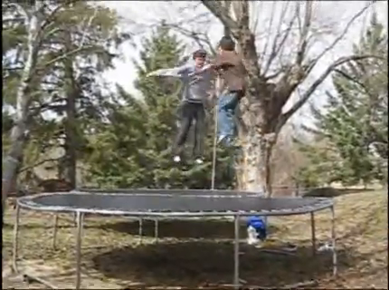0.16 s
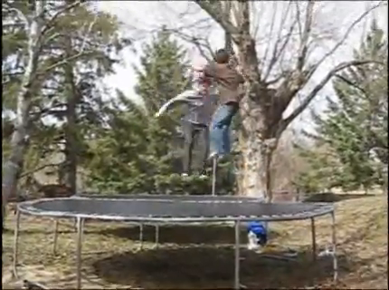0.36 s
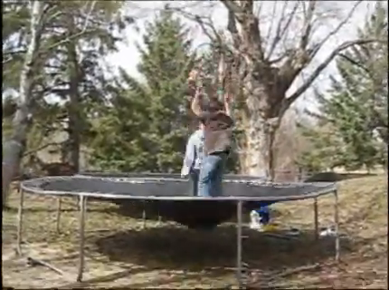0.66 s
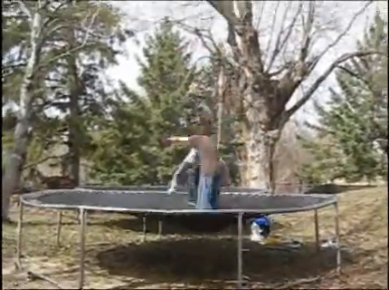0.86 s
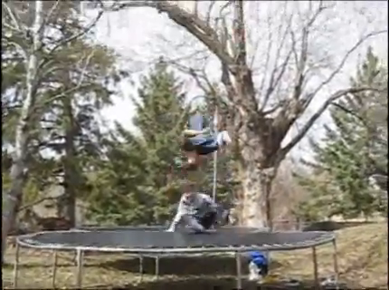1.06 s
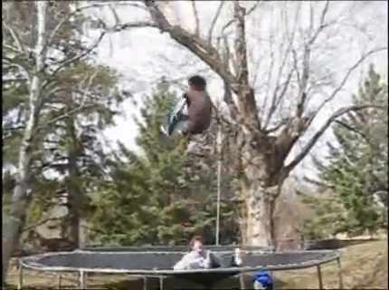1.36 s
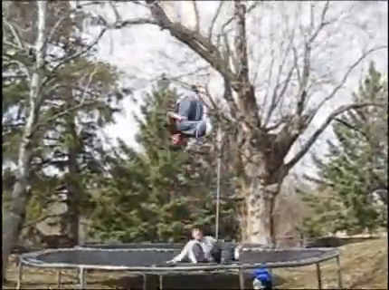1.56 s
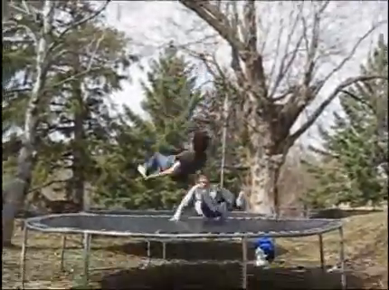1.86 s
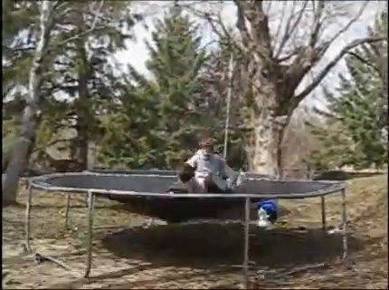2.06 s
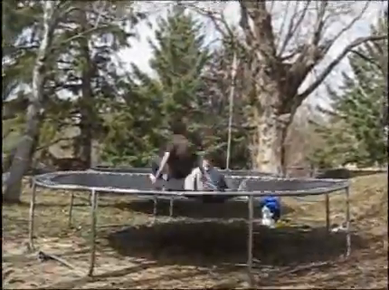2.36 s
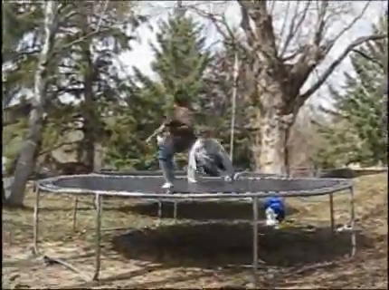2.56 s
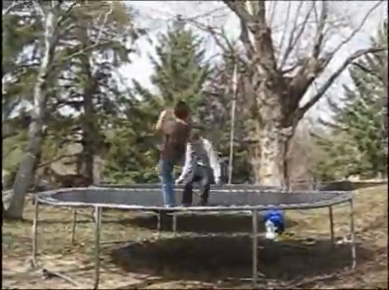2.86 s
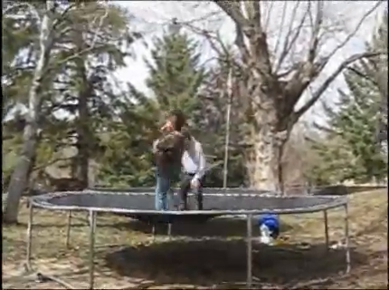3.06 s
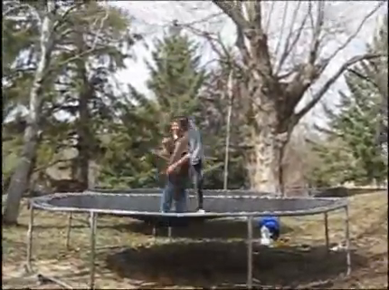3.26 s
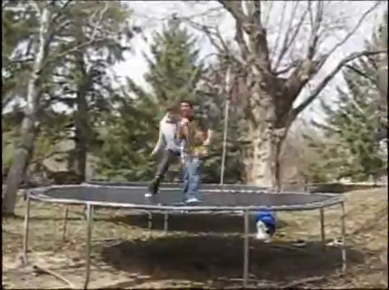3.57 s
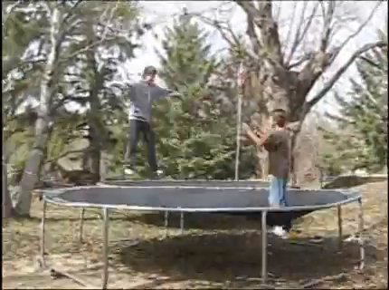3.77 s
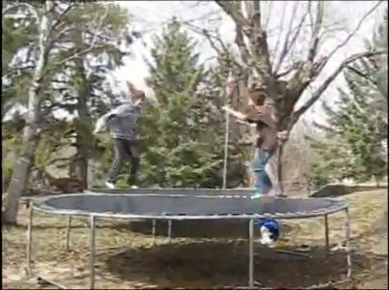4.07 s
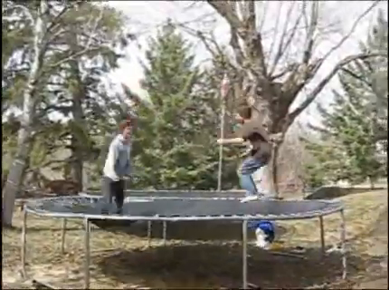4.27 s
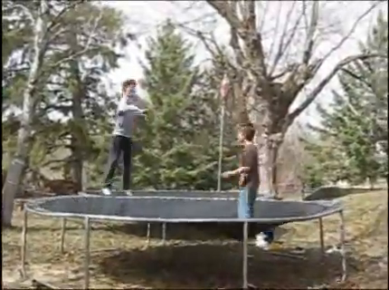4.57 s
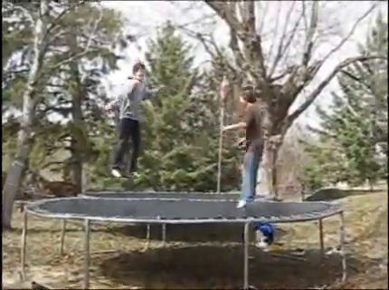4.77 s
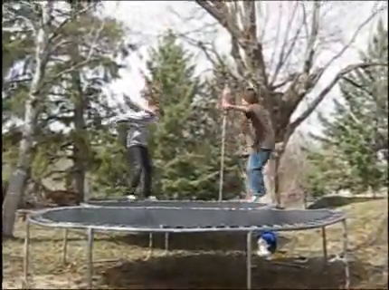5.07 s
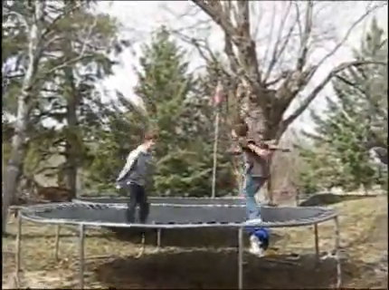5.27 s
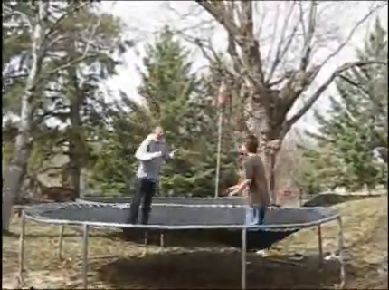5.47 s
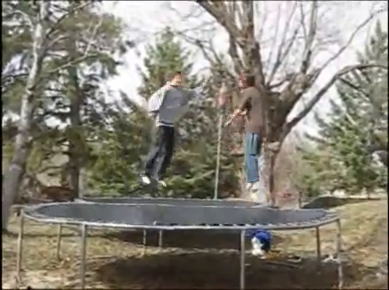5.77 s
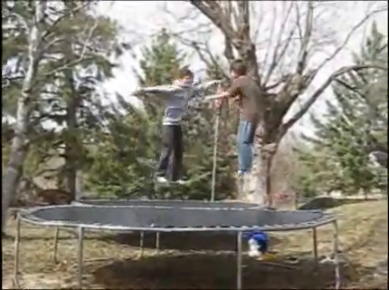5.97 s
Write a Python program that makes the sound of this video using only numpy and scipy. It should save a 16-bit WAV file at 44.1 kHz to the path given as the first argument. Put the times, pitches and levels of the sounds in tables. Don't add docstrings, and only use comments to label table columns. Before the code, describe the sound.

Bright metallic spring rattle and mat rasp surge and fade with trampoline landings outdoors, over soft wind, with one abrupt silent gap.

```python
import sys
import numpy as np
from scipy import signal
from scipy.fft import rfft, irfft, next_fast_len
from scipy.io import wavfile
from scipy.ndimage import uniform_filter1d

SR = 44100
rng = np.random.default_rng(int(sys.argv[2]) if len(sys.argv) > 2 else 0)


def ratio(d):
    e = np.asarray(d, float) / 20
    return 10 ** e


def master_out(mix):
    frames = np.transpose(np.atleast_2d(mix))
    ceiling = np.clip(frames, -1, 1)
    pcm = np.round(ceiling * 32767).astype(np.int16)
    wavfile.write(sys.argv[1], SR, pcm)


N = 270333


def in_time(rows):
    s, *columns = np.transpose(rows)
    return [np.interp(np.arange(N) / SR, s, c) for c in columns]


def rms_one(x):
    return x / np.sqrt(np.mean(x ** 2) + 1e-20)


def at_hz(points, hz):
    f, db = np.array(points).T
    return np.interp(np.log(np.maximum(hz, 1)), np.log(f), db)


def colour(x, points):
    size = next_fast_len(N + 8192)
    bins_hz = np.arange(size // 2 + 1) * SR / size
    cepstrum = irfft(np.log(ratio(at_hz(points, bins_hz))), size)
    cepstrum[1:size // 2] *= 2
    cepstrum[size // 2 + 1:] = 0
    return rms_one(irfft(rfft(x, size) * np.exp(rfft(cepstrum)), size)[:N])


def drift(rate_hz):
    r = np.exp(-2 * np.pi * rate_hz / SR)
    wander = signal.lfilter([1], [1, -2 * r, r * r], rng.standard_normal(N + SR))
    return rms_one(wander[SR:])


def ring(clicks, hz, t60):
    r, w = ratio(-60 / (t60 * SR)), 2 * np.pi * hz / SR
    return signal.lfilter([0, np.sin(w)], [1, -2 * r * np.cos(w), r * r], clicks + 1e-18)


def slips(per_s, spread_db):
    sizes = ratio(spread_db * np.minimum(rng.exponential(1, N), 5)) * rng.choice([-1, 1], N)
    return rms_one(sizes * (rng.random(N) < per_s / SR))


def steps(rows):
    out = np.zeros(N + SR)
    since = np.arange(SR // 2) / SR
    for s, peak_db, t60 in rows:
        out[round(s * SR):][:SR // 2] += ratio(peak_db - 60 * since / max(t60, .005))
    return out[:N]


def blows(rows):
    out = np.zeros(N + SR)
    for s, peak_db, hz, t60 in rows:
        push = np.zeros(round(min(1.5 * t60 + .01, 1) * SR))
        soft = np.hanning(round(SR / hz / 2) + 2)
        push[:len(soft)] = soft / soft.sum()
        out[round(s * SR):][:len(push)] += ratio(peak_db) * ring(push, hz, max(t60, .001))
    return out[:N]


def tone(rows, width_hz, depth):
    first, last = rows[0], rows[-1]
    fade_in, fade_out = (first[0] - .02, first[1], -140), (last[0] + .02, last[1], -140)
    hz, db = in_time([fade_in, *rows, fade_out])
    turn = 2 * np.pi * np.cumsum(hz) / SR
    along = (1 + depth * drift(width_hz)) * np.cos(turn)
    across = depth * drift(width_hz) * np.sin(turn)
    return ratio(db) * rms_one(along + across)


def tree_wind(level):
    # [t/s, level/dB]
    gusts = [
        (0, -50.5),
        (1.0, -51),
        (2.0, -49),
        (3.2, -50.5),
        (3.8, -47.5),
        (5.0, -47.5),
        (5.6, -47.5),
        (6.13, -49.5),
    ]
    # [f/Hz, level/dB]
    air = [(20, -15.5), (60, -1), (150, -0.5), (400, 1.5), (750, 3), (1300, 2), (2000, -3), (3000, -7.5),
           (5000, -20.5), (7000, -22), (9000, -20), (11000, -15.5), (15500, -28), (17000, -37.5)]
    duck_db, knee_db = -2.5, -33.5
    loudness = level ** 2 / (level ** 2 + ratio(knee_db) ** 2)
    pull_db = duck_db * uniform_filter1d(loudness, SR // 10)
    gain = ratio(in_time(gusts)[0] + pull_db + 1.0 * drift(6.1))
    return gain * colour(rng.standard_normal(N), air)


def port_rumble():
    # [t/s, level/dB, t60/s]
    bump_hits = [
        (.76, -63.5, .8),
        (2.062, -48, 1.0),
        (2.16, -57, 0.55),
        (2.595, -54, .4),
    ]
    rumble_db, top_hz = -71.5, 280
    lumps = signal.sosfilt(signal.butter(2, top_hz, fs=SR, output="sos"), rng.standard_normal(N))
    return np.hypot(ratio(rumble_db), steps(bump_hits)) * ratio(4.6 * drift(18)) * rms_one(lumps)


def far_drone():
    # [t/s, f/Hz, level/dB]
    drone_tones = [
        [(0.73, 229.2, -63), (1.2, 232.2, -62.5), (1.9, 229.2, -64), (2.7, 235, -56.5), (3.2, 232.7, -58)],
        [(3.8, 85.46, -64), (4.25, 85.6, -61), (4.55, 88.7, -66), (4.85, 91.5, -55.5), (5.4, 89.6, -57.5),
         (5.7, 90, -72)],
        [(3.8, 130.4, -61), (4.5, 138.9, -61.5), (5.5, 147.6, -65)],
        [(5.65, 125.6, -62), (5.9, 121.6, -56), (6.13, 121.8, -52)],
    ]
    # [t/s, f/Hz, level/dB]
    hum_tone = [
        (3.8, 333.2, -51),
        (4.5, 332.8, -55),
        (6.13, 328.5, -52.5),
    ]
    drone = sum(tone(rows, width_hz=6, depth=.3) for rows in drone_tones)
    return drone + tone(hum_tone, width_hz=56, depth=1.1)


def faint_bird():
    # [t/s, f/Hz, level/dB]
    call = [
        (.43, 3800, -84),
        (.46, 3620, -64),
        (.53, 3550, -68),
        (.56, 3630, -70),
        (.585, 3570, -59),
        (.62, 3500, -73),
        (.64, 3490, -85),
    ]
    return tone(call, width_hz=25.0, depth=0.5)


def thuds():
    # [t/s, level/dB, f/Hz, t60/s]
    thud_hits = [(.06, -41.5, 482, 0.17), (2.063, -42, 328, .02), (.78, -45.5, 79.4, 0.2),
                 (1.132, -29.5, 628, 0.076), (1.2, -44, 223, 0.3), (2.062, -23, 140, 0.026),
                 (2.064, -25, 825, .015), (2.09, -27, 730, 0.084), (2.115, -36.5, 152, .14),
                 (2.145, -38, 236, .1), (2.1, -47, 90, 0.18), (2.25, -45, 60, 0.12), (2.6, -38, 208, 0.057),
                 (2.715, -32, 1450, .06), (2.772, -33, 1350, 0.044), (2.795, -37, 1290, .04),
                 (4.6, -34, 1410, .1), (5.45, -34, 1394, .1), (3.135, -33.5, 583, 0.11),
                 (3.137, -36.5, 738, 0.13), (3.141, -30, 1407, 0.09), (3.895, -23.5, 1078, 0.017),
                 (4.35, -35.5, 798, 0.16), (5.38, -36.5, 758, 0.12), (5.55, -41, 694, 0.14)]
    return blows(thud_hits)


def mat(clicks, rasp, hiss):
    # [f/Hz, level/dB]
    rasp_colour = [(300, -36.5), (500, -16.5), (700, -1.5), (1000, -4), (1350, 5), (1700, 4), (2200, -31.5)]
    hiss_colour = [(7000, -38), (8200, -2.5), (9300, 3.5), (10500, -1.5), (13000, -4), (15500, -6.5),
                   (17000, -19)]
    low = colour(0.55 * clicks + rng.standard_normal(N), rasp_colour) * ratio(1.4 * drift(7.1))
    pitches = np.geomspace(8400, 15200, 24) * ratio(0.092 * rng.standard_normal(24))
    dealt = rng.integers(0, 96, N)
    tinkle = sum(ring(clicks * (dealt == k), hz, 350.0 / hz) for k, hz in enumerate(pitches))
    friction = 0.31 * clicks + rng.standard_normal(N) + ratio(-8.5) * rms_one(tinkle)
    high = colour(friction, hiss_colour) * ratio(1.2 * drift(25))
    return rasp * low + hiss * high


def ringing_on():
    # [t/s, level/dB, f/Hz, t60/s]
    ping_hits = [(.01, -27.5, 3600, 0.71), (.21, -51.5, 4600, .7), (.05, -36, 2320, .3),
                 (0.72, -53, 3140, .12), (0.66, -55, 2600, .1), (1.3, -36, 4600, 0.096),
                 (0.86, -37, 4500, .15), (2.6, -45.5, 4900, .5), (.7, -31, 2150, 0.13),
                 (3.2, -17, 3700, 0.14), (5.7, -32, 3720, .3), (5.66, -34, 2900, 0.19),
                 (3.9, -25, 5830, 0.28), (4.725, -20, 2570, 0.15), (4.95, -42, 3400, 0.75),
                 (4.1, -37, 3900, 0.55), (4.95, -44, 3300, 0.5), (5.82, -37.5, 3200, 0.97),
                 (.05, -34, 3124, 1.1), (.05, -36, 3058, .9), (.03, -32, 3290, .45), (.08, -39, 3200, .7),
                 (4.85, -40, 3247, .8), (4.9, -41, 3130, .7), (5.08, -49, 3450, .4), (5.8, -40, 3250, 1.0),
                 (5.87, -39, 3730, .7), (5.95, -43, 4850, .6), (5.9, -48, 4130, .4)]
    rows = ping_hits
    waver_depth, waver_hz = .8, 40
    return sum(blows(rows[k::3]) * 0.69 * (1 + waver_depth * drift(waver_hz)) for k in range(3))


def rough_tones():
    # [t/s at the top, f/Hz, level/dB]
    tone_swells = [(0.044, 4530, -36), (0.046, 2220, -34.5), (0.087, 3100, -38), (0.713, 2166, -42),
                   (0.72, 4570, -42), (0.736, 3270, -41), (0.755, 5430, -37), (0.877, 3740, -41),
                   (0.988, 3285, -42), (1.138, 4030, -37), (1.139, 2950, -37), (1.142, 4570, -35),
                   (1.428, 4570, -35), (1.624, 3090, -38.5), (2.106, 4470, -35.5), (2.145, 3100, -40),
                   (2.151, 5980, -46), (2.155, 3790, -40), (2.239, 3150, -38), (2.318, 4500, -41),
                   (2.339, 3100, -35.5), (2.347, 4610, -37), (2.352, 5600, -35), (2.474, 3200, -36.5),
                   (3.064, 5180, -39), (3.146, 3100, -42.5), (3.86, 4195, -38), (3.862, 5240, -39),
                   (3.865, 3460, -31), (3.87, 5580, -39), (3.966, 3530, -37), (3.974, 4840, -40),
                   (4.016, 3100, -40), (4.355, 2240, -38), (4.36, 5080, -38), (4.373, 3210, -36),
                   (4.386, 5610, -35), (4.574, 3650, -32), (4.58, 5400, -33.5), (4.734, 3680, -32),
                   (4.843, 3110, -35), (4.852, 5450, -36), (4.897, 3060, -40.5), (5.368, 5150, -32.5),
                   (5.407, 3090, -33.5), (5.581, 3110, -40), (5.608, 4150, -39), (5.632, 3204, -33)]
    length_s, gain_db, width_hz, roughness = 0.05, 3, 90, .9
    out = np.zeros(N + SR)
    rough = roughness * np.array([drift(width_hz), drift(width_hz)])
    swell = np.hanning(round(length_s * SR))
    for s, hz, db in tone_swells:
        at = round(s * SR) - len(swell) // 2 + np.arange(len(swell))
        turn = 2 * np.pi * hz * at / SR
        along, across = rough[:, (at + 7 * round(hz)) % N]
        out[at] += ratio(db + gain_db) * swell * ((1 + along) * np.cos(turn) + across * np.sin(turn))
    return out[:N]


def snaps():
    # [t/s, level/dB]
    hook_snaps = [(0.0532, -18), (0.2106, -26), (0.707, -20), (0.7885, -26), (0.9161, -28), (1.0805, -24),
                  (1.1072, -19), (1.1362, -19), (1.1755, -13.5), (1.2909, -23), (1.517, -24), (1.5596, -31),
                  (1.6263, -24), (1.6524, -24), (1.699, -25), (1.865, -24), (1.9308, -22), (1.9581, -28),
                  (2.2894, -19), (2.3802, -26), (2.3987, -29), (2.4887, -15), (2.5104, -17), (2.5751, -23),
                  (2.5994, -23), (2.6934, -23), (2.7427, -25), (2.786, -27), (2.9059, -31), (2.937, -31),
                  (3.0964, -20), (3.1459, -18.5), (3.8551, -19), (3.8699, -15.5), (3.938, -20),
                  (3.9611, -19), (4.1653, -26), (4.23, -30), (4.3577, -17), (4.4144, -27), (4.5078, -18),
                  (4.5692, -17), (4.636, -17), (4.7281, -14.5), (4.8476, -12.5), (4.8924, -22),
                  (5.3652, -14.5), (5.3744, -19), (5.5819, -19), (5.8704, -23)]
    modes = (3300, -3), (4900, -3), (9500, -7)      # (f/Hz, level/dB)
    t60 = .0035
    spread = ratio(1.0 * rng.standard_normal((len(hook_snaps), 3)))
    rows = []
    for (s, db), detune in zip(hook_snaps, spread):
        for (hz, mode_db), k in zip(modes, detune):
            rows.append((s, db + mode_db, hz * k, t60))
    return blows(rows)


def jolts():
    # [t/s, level/dB]
    jolt_hits = [(.0494, -19), (.2089, -19.5), (.7594, -13), (.9805, -12), (1.0794, -11), (1.1344, -8),
                 (1.5792, -10), (.9, -17), (1.44, -10), (2.1044, -14), (2.1534, -6.5), (2.3511, -7.5),
                 (2.5194, -24), (2.5995, -10), (2.24, -12), (2.405, -13), (2.4703, -14), (2.215, -15),
                 (1.065, -16), (4.37, -16), (4.415, -20), (5.58, -16), (5.73, -9), (3.1446, -19),
                 (3.8535, -9.5), (3.868, -10), (3.096, -16), (3.938, -9), (3.961, -9.5), (3.994, -11),
                 (4.347, -15), (4.501, -25), (4.5694, -11), (4.555, -11), (4.58, -13), (4.6344, -11),
                 (4.7254, -5), (4.8493, -10), (5.3642, -18), (5.4044, -12), (5.6194, -9), (5.8044, -25)]
    rise_s, t60 = 0.006, 0.054
    sudden = steps([(s, db - 16.0, t60) for s, db in jolt_hits])
    return uniform_filter1d(sudden, round(rise_s * SR) + 1)


def load():
    # [t/s at full load, rise/s, hold/s, level/dB, brightness/dB]
    foot_strokes = [(0.0, .02, 0.051, -27, -1.5), (0.706, 0.027, 0.21, -28, 2.5),
                    (0.955, 0.082, 0.08, -27.5, 2.5), (1.065, 0.03, 0.12, -27.5, -2),
                    (1.243, 0.067, 0.15, -39, -1.5), (1.405, 0.14, .18, -27.5, 1),
                    (1.607, .05, 0.087, -31.5, 3), (1.713, .06, 0.16, -38, -1.5),
                    (2.09, 0.033, 0.46, -28, 1.5), (2.605, 0.013, 0.031, -32, 2),
                    (2.726, 0.081, 0.014, -30.5, 2.5), (2.769, .03, 0.023, -36, -1),
                    (2.87, .03, .02, -50, 0), (2.897, 0.012, 0.014, -41, 2),
                    (3.034, 0.109, 0.056, -33.5, 2), (3.12, .03, .05, -35.5, 2),
                    (3.839, 0.0094, 0.024, -25.5, 3), (3.925, 0.032, 0.056, -32.5, 2.5),
                    (4.015, 0.058, 0.18, -33, -2.5), (4.351, 0.055, 0.08, -25.5, 0.5),
                    (4.511, 0.085, 0.088, -27, 1), (4.611, 0.037, 0.26, -28.5, -1),
                    (4.897, .04, 0.071, -36, -2.5), (5.358, 0.033, .34, -27.5, 1),
                    (5.716, 0.044, 0.093, -29, -1.5)]
    # [t/s, level/dB, brightness/dB]
    brief_swells = [(0.13, -34.5, 0.5), (0.15, -36, -2), (0.21, -37.5, 3), (.285, -50, 4),
                    (.643, -59.5, 2.5), (.76, -31.5, 6), (1.27, -39.5, 8.5), (1.864, -36.5, 0),
                    (1.8, -42.5, -0.5), (1.947, -36, 1), (1.955, -40.5, -1), (2.2, -31, 9),
                    (2.32, -34, 1.5), (2.005, -45.5, 1), (2.85, -49, -1), (2.937, -42, 1.5),
                    (3.146, -28, 1), (4.225, -40, 1), (4.26, -50, -8), (4.295, -51, -2), (4.165, -44, 11),
                    (2.045, -50, 2), (2.69, -40, -3.5), (2.977, -43, -1.5), (.088, -39, -3), (4.95, -51, 0),
                    (5.04, -59, -5), (5.09, -46, -5), (5.58, -31, -2), (5.75, -34.5, 13), (5.84, -37, -2),
                    (5.825, -35, -2), (4.47, -33, 0), (2.585, -37, 1), (1.915, -41, 0), (.2, -42, -2),
                    (5.878, -35.5, -3.5), (5.91, -39, -6), (5.954, -39.5, 2.5), (5.985, -64, 1),
                    (6.043, -52, 3)]
    brief_rise_s, brief_hold_s = 0.023, 0.0056
    rise_curve, sag_db_per_s, release_db_per_s = 2.12, 2, 300.5
    impact_db, impact_s = 2, 0.064
    t = np.arange(0, N, 16) / SR
    power, bright, impact = 1e-9, 0, 0
    brief_strokes = [(s, brief_rise_s, brief_hold_s, db, tilt) for s, db, tilt in brief_swells]
    for s, rise, hold, db, bright_db in foot_strokes + brief_strokes:
        since = np.maximum(t - s, 0)
        released = np.maximum(since - hold, 0)
        loss_db = np.minimum(sag_db_per_s * since + release_db_per_s * released, 150)
        swell = np.clip(1 + (t - s) / rise, 0, 1) ** rise_curve
        stroke = (ratio(db - loss_db) * swell) ** 2
        power = power + stroke
        bright = bright + bright_db * stroke
        impact = impact + impact_db * np.exp(-since / impact_s) * stroke
    return in_time(np.transpose([t, np.sqrt(power), bright / power, impact / power]))


def linger(level):
    after_db, t60, idle_db = -19, 0.75, -65.5
    r = ratio(-120 / (t60 * SR))
    after, _ = signal.lfilter([1 - r], [1, -r], level ** 2, zi=[level[0] ** 2])
    return np.sqrt(level ** 2 + ratio(after_db) ** 2 * after + ratio(idle_db) ** 2)


def frame_clatter(steel):
    # [f/Hz, level/dB]
    clatter_colour = [(1300, -30), (1750, -3.5), (2150, 2), (2550, 1), (3100, -26)]
    return colour(steel, clatter_colour)


def hook_rattle(steel):
    # [f/Hz, level/dB]
    rattle_colour = [(2300, -28.5), (2800, -1.5), (3100, 0.5), (3700, 1), (4500, 0.5), (5500, -1.5),
                     (6500, -6), (7500, -7.5), (8500, -19)]
    return colour(steel, rattle_colour)


def springs(level):
    # [f/Hz, level/dB, t60/s]
    coil_modes = [(1380, -16, .08), (1910, -15, .12), (2100, -19, .15), (2330, -13, .2), (2985, -10.5, 0.5),
                  (3060, -6.5, 0.76), (3095, -4, 0.58), (3115, -9.5, 0.5), (3130, -10.5, 0.6),
                  (3270, -6, 0.92), (3460, -4, 0.42), (3345, -7.5, 0.37), (3710, -5, 0.3), (4170, -5, 0.26),
                  (4550, -5.5, 0.17), (5020, -12, .2), (5530, -12, .15), (8780, -9.5, 0.2),
                  (9110, -10.5, .12)]
    clicks = slips(per_s=7000, spread_db=1.0)
    pitches = np.geomspace(1800, 7300, 60) * ratio(0.093 * rng.standard_normal(60))
    dealt = rng.integers(0, 60, N)
    busy = ratio(2.2 * np.array([drift(15) for side in range(5)]))
    busy /= np.sqrt(np.mean(busy ** 2, axis=0))
    short = 0
    for k, hz in enumerate(pitches):
        short = short + ring(clicks * (dealt == k) * busy[k % 5], hz, 150.0 / hz) * np.sqrt(hz)
    steel = clicks + ratio(-4.5) * rms_one(short)
    white, long = rng.standard_normal((3, N)), 0
    for k, (hz, db, t60) in enumerate(coil_modes):
        for twin in (0, 1):
            drive = level * white[(k + twin) % 3] * busy[(k + 2 * twin) % 5]
            twin_hz = hz * (1 + .005 * (twin - .5))
            long = long + ratio(db) * ring(drive, twin_hz, t60) / np.sqrt(t60 * SR)
    return steel, ratio(-0.5) * long, clicks


def scene():
    strokes, bright_db, impact_db = load()
    strokes = strokes * ratio(-0.5 + .5 * drift(60))
    sudden = jolts()
    level = np.hypot(strokes, sudden)
    low = linger(np.hypot(strokes * ratio(impact_db), ratio(0.5) * sudden))
    apart = np.arange(N) > 3.5 * SR
    rasp_db = -12 - 0.4 * bright_db - 3.5 * apart
    clatter_db = -8 - .6 * bright_db - 3 * apart + 0.6 * drift(6.2)
    hiss_db = -7.5 + bright_db

    steel, ringing, clicks = springs(level)
    mono = tree_wind(level) + port_rumble() + far_drone() + faint_bird()
    mono += thuds()
    mono += mat(clicks, low * ratio(rasp_db + 1.5), level * ratio(hiss_db + 1.5))
    mono += ringing_on() + rough_tones() + snaps()
    mono += low * ratio(clatter_db) * frame_clatter(steel)
    mono += linger(level) * hook_rattle(steel)
    mono += ringing * ratio(2 * apart)
    return np.stack([mono, mono])


def band_limit(x):
    return signal.sosfilt(signal.butter(12, 16290, fs=SR, output="sos"), x)


def record(dry):
    # [f/Hz, width/Hz, depth/dB]
    hollows = [
        (1052, 170, -5.5),
        (1639, 230, -9.5),
        (2620, 230, -5.5),
    ]
    dead_spot = [
        (7885, 900, -16),
        (7890, 150, -60),
        (7865, 150, -50),
    ]
    # [t/s, level/dB]
    dropout = [
        (3.1525, 0),
        (3.1535, -22),
        (3.17, -24),
        (3.179, -38),
        (3.181, -200),
        (3.849, -200),
        (3.85, -45),
        (3.8525, -30),
        (3.8535, 0),
    ]
    x = signal.sosfilt(signal.butter(2, 40, "high", fs=SR, output="sos"), dry)
    x = signal.sosfilt(signal.ellip(16, .5, 80, 15500, fs=SR, output="sos"), x)
    for hz, width_hz, db in hollows + dead_spot:
        w, a = 2 * np.pi * hz / SR, np.pi * width_hz / SR
        dip = [1 + a * ratio(db), -2 * np.cos(w), 1 - a * ratio(db)]
        x = signal.lfilter(dip, [1 + a, -2 * np.cos(w), 1 - a], x)
    return band_limit(x * ratio(in_time(dropout)[0]))


dry = scene()
out = record(dry)
master_out(out)
```